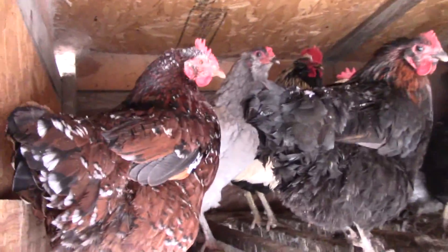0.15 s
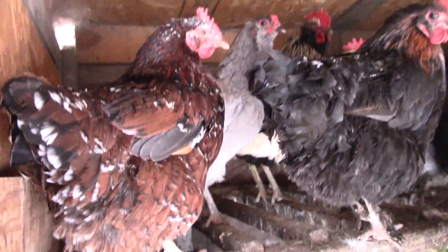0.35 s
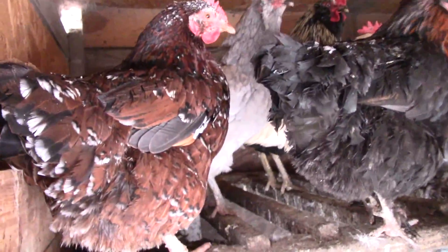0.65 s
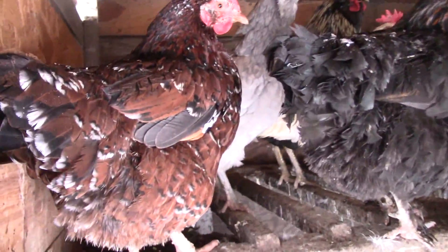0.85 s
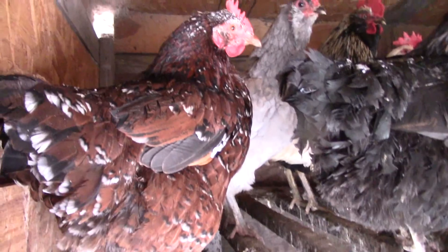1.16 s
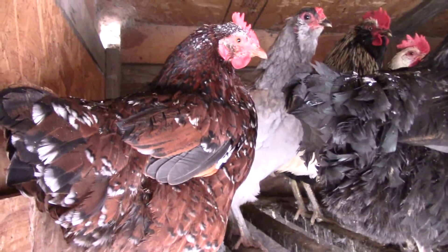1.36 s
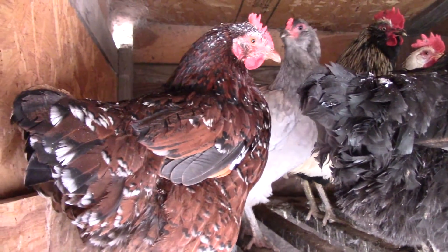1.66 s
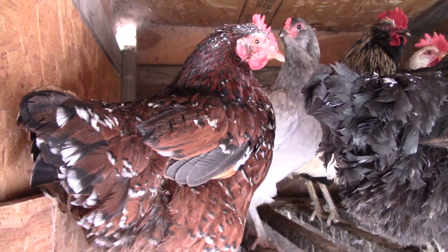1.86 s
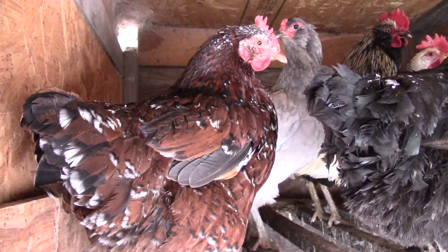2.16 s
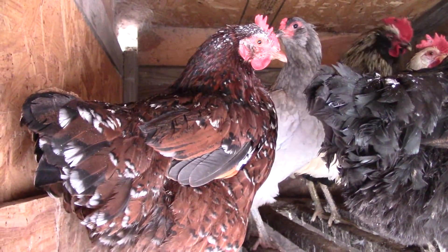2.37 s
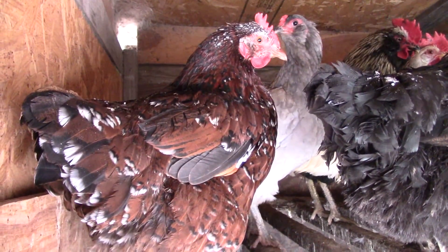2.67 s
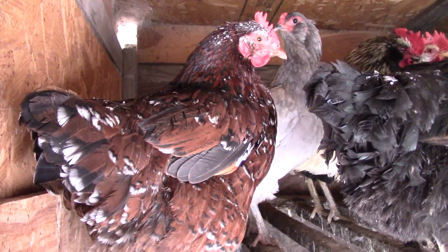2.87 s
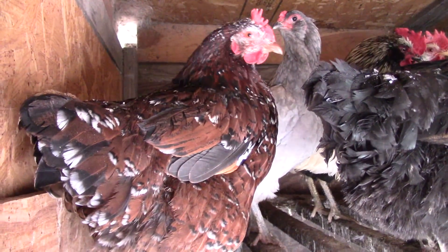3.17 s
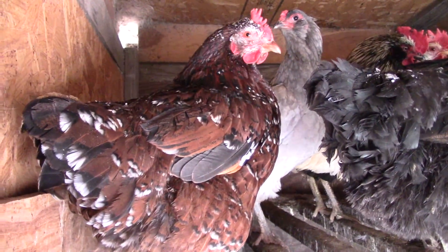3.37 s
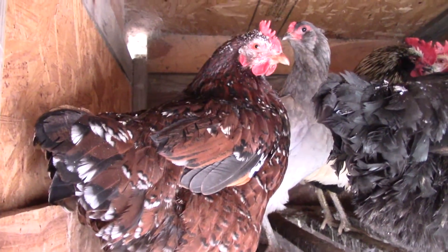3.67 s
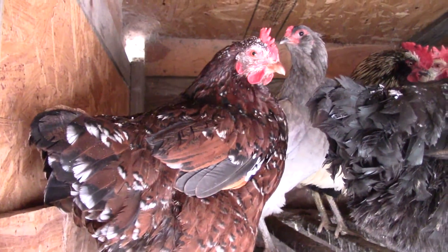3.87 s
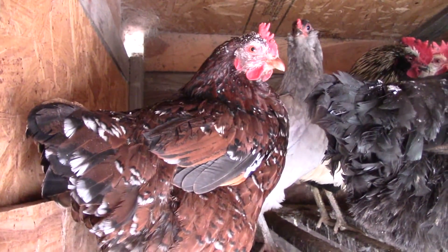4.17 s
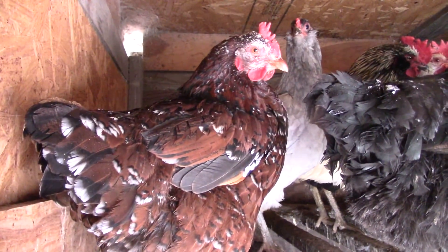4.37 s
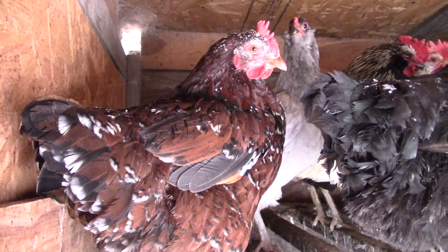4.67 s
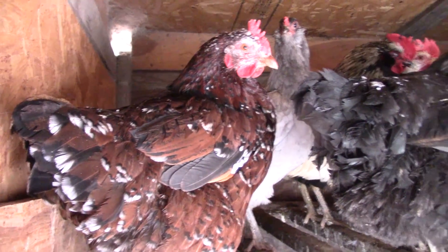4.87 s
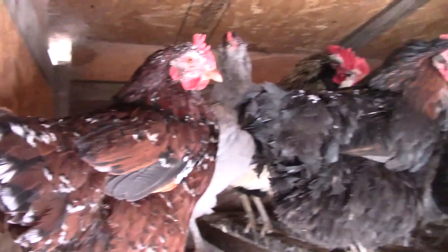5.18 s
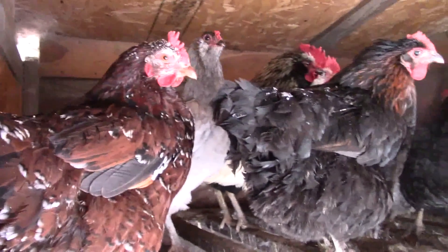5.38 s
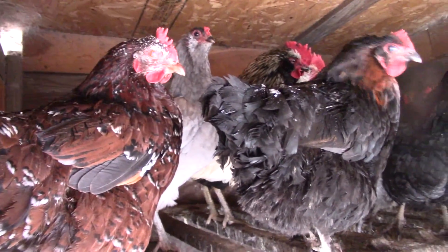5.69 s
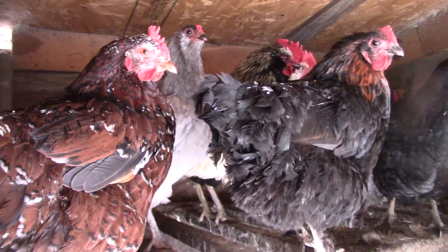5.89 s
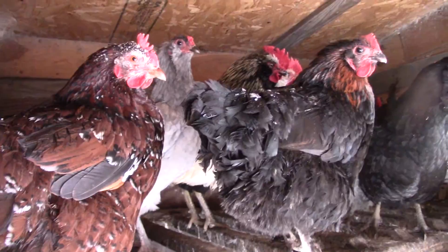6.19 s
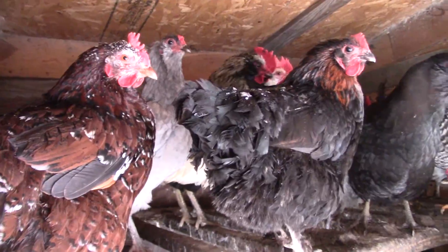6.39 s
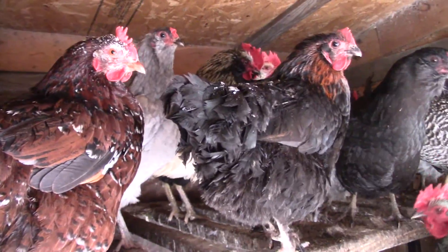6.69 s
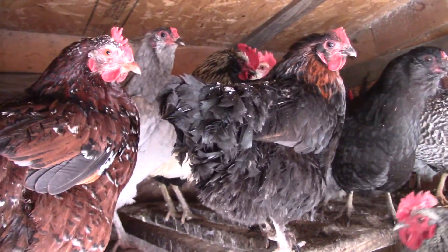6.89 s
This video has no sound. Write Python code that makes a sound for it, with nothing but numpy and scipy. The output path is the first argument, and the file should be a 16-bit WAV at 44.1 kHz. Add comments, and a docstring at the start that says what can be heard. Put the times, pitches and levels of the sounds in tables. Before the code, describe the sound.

A flock of hens shifts on wooden perches, heard by a close stereo microphone with a tight, short echo. A nasal cluck opens, one hoarse sustained call follows, then clipped clucks at uneven gaps. Low purring clucks and a few brighter pops come mid-way, then the voices die away. Dull thuds, claw taps, dry clicks and litter rustle continue quietly to the end.

```python
"""A short nasal cluck, then one long hoarse call, then short clucks traded and dying down: hens in a plywood coop.
Voices are harmonic stacks; clucks sit under bell-shaped puffs. Low thuds and claw ticks are damped sines and noise.
Dry clicks and crackles are band noise, feathers and litter dense noise grains, faint high tones wavering sines,
the hush shaped noise. Feedback delays give voices, thuds and claws the coop's short echo."""
import sys
import numpy as np
from scipy import signal
from scipy.fft import rfft, irfft, next_fast_len
from scipy.io import wavfile

SR = 44100
rng = np.random.default_rng(int(sys.argv[2]) if len(sys.argv) > 2 else 0)


def bounce(signal):
    """Save signal as a 16-bit WAV file at the path given by the first command-line argument."""
    frames = np.transpose(np.atleast_2d(signal))
    limited = np.clip(frames, -1, 1)
    pcm = np.round(limited * 32767).astype(np.int16)
    wavfile.write(sys.argv[1], SR, pcm)


N = 310331

# outdoor hush spectrum: (frequency [Hz], relative density [dB per Hz])
HUSH_SPECTRUM = [(15, -52), (30, -19), (123, -3), (256, -3), (700, -14), (2600, -24), (6600, -26),
                 (13000, -35.5), (17000, -37.5)]
HUSH_RMS_DB = -56.5
# left-right likeness of noise: (frequency [Hz], likeness [-1 to 1])
LIKENESS = [(40, 0.95), (250, .99), (1650, 0.81), (15000, 0.92)]

COOP_T60_S, WALL_CUT_HZ, COOP_DB = 0.073, 12000, -10
TOP_CUT_HZ = 16300

# faint wavering high tones: (start [s], length [s], start pitch [Hz], end pitch [Hz], mean level [dB])
HIGH_TONES = [(6.008, .03, 10300, 12500, -64), (6.238, .06, 14000, 12400, -62),
              (5.965, .18, 6950, 7050, -65)]

# short dry clicks and crackles: (time [s], peak [dB], band centre [Hz])
CRACKLES = [(0.6, -34, 1750), (5.135, -41, 1962), (5.2285, -40, 1600), (2.992, -48, 2870),
            (4.622, -47, 3480), (4.695, -37.5, 2640), (4.858, -42.5, 2200), (0.9303, -46.5, 5300),
            (3.7055, -44, 7800), (4.0572, -51, 4030), (5.2604, -45.5, 9140), (5.3373, -47, 6000),
            (5.766, -47, 5270), (5.856, -41.5, 7050), (6.2264, -41, 7750), (6.6104, -48, 9180),
            (2.5232, -47, 13700), (5.3617, -49, 12700), ]
FAINT_PER_S, FAINT_MAX_DB, CRACKLE_T60_S = 8.9, -58, 0.015
CRACKLE_HALF_BAND = 0.15   # share of the band centre

# flock shifting about: (time [s], rustle level [dB], shuffle level [dB])
STIR = [(0, -54.5, -33.5), (.12, -51, -51.5), (.18, -60.5, -47.5), (.95, -59.5, -45.5), (1.1, -49, -46.5),
        (1.2, -65.5, -56.5), (1.65, -66.5, -52), (2.05, -58.5, -51.5), (2.7, -63.5, -57), (3.28, -63, -56),
        (3.36, -52, -45.5), (3.6, -60.5, -49), (4.25, -62, -56.5), (4.45, -55.5, -48), (4.95, -61, -55),
        (5.07, -54.5, -49.5), (5.35, -63.5, -58.5), (6.9, -61.5, -53.5), (7.04, -47, -57)]
# feather and litter rustle: (frequency [Hz], relative density [dB per Hz])
RUSTLE_SPECTRUM = [(700, -5.5), (1200, -0.5), (2760, -8), (7300, -16), (14000, -30), (17000, -34)]
# shifting weight: (frequency [Hz], relative density [dB per Hz])
SHUFFLE_SPECTRUM = [(35, -61), (140, -8.5), (280, -2.5), (700, -9.5), (2500, -30), (3300, -27.5)]
SWISH_S, SWISH_HALF_S, SWISH_DB, SWISH_HZ = 5.058, 0.032, -56.5, (2200, 7200)

# low thuds and one low blunt cluck: (time [s], peak [dB], main ring [Hz])
THUDS = [(1.657, -28.5, 352), (1.934, -25, 338), (1.991, -26.5, 410), (2.074, -33.5, 387),
         (2.198, -36, 376), (2.271, -28.5, 293), (2.525, -30.5, 293), (2.572, -26.5, 319),
         (2.598, -30, 314), (3.319, -32, 222), (3.57, -21.5, 370), (4.296, -32.5, 428), (4.472, -32.5, 271),
         (5.085, -35, 212), (5.224, -26, 292), (5.501, -40, 353), (5.66, -40.5, 380), (5.976, -33.5, 420),
         (6.078, -39, 380), (6.204, -34, 312), (6.459, -35, 530), (6.856, -31, 295), (7.016, -27, 174)]

# claws and beaks on wood: (time [s], snap onset [dB], knock before KNOCK_GAIN and band-pass [dB], wood struck)
TICKS = [(0.4697, -36.5, -47, "board"), (1.0335, -32.5, -34, "slat"), (1.122, -26, -30.5, "slat"),
         (1.3139, -44, -49, "board"), (1.826, -38, -23, "slat"), (1.8445, -29, -48, "slat"),
         (1.932, -44, -28, "slat"), (1.9885, -34.5, -21, "slat"), (2.199, -46, -34, "slat"),
         (2.209, -55, -35, "slat"), (2.272, -49, -51, "slat"), (2.471, -44, -35.5, "slat"),
         (2.5616, -28.5, -17.5, "board"), (2.5721, -50, -11, "board"), (2.6063, -40, -22.5, "board"),
         (2.9399, -30.5, -26, "board"), (2.946, -47, -10, "board"), (3.315, -42, -32, "slat"),
         (3.425, -44, -35, "slat"), (3.5238, -45.5, -37, "board"), (4.186, -42, -50, "slat"),
         (4.4293, -48, -27.5, "board"), (4.4739, -62, -28.5, "board"), (4.695, -43, -32, "board"),
         (5.0833, -48, -31.5, "board"), (6.851, -44.5, -38, "board"), (7.01, -34, -42, "board")]
# wood: (tip skid [s], modes as (frequency [Hz], relative level [dB], t60 [s]))
WOODS = {"board": (.0001, [(760, -16, 0.026), (870, 3, 0.012), (975, -8, 0.01), (2230, -22.5, 0.025)]),
         "slat": (.006, [(1047, 1, 0.022), (1346, 3.5, 0.0092), (1750, -4, 0.0084), (2140, -3.5, 0.017),
         (3260, 2, 0.0071)])}
# hard-tip snap: (frequency [Hz], relative density [dB per Hz])
SNAP_SPECTRUM = [(900, -43), (1600, 2.5), (5600, 6.5), (8000, -12.5), (14000, -29), (17000, -13)]
KNOCK_GAIN = 0.64

VOICE_LEAN_HZ, VOICE_LEAN_LAG_S = (450, 850), .00028
CALL_LEAN_DB, CLUCK_LEAN_DB = -21, -22.5

# long call contour: (time [s], pitch [Hz], fundamental rms [dB], hoarseness [0-1])
CALL = [(.187, 397, -30, 0.6), (.201, 327.4, -26, 0.03), (.235, 334.3, -27, 0.25), (.29, 316.7, -28.5, 0.2),
        (.334, 322, -27.5, 0.14), (.38, 315.5, -29.5, 0.16), (.435, 324.7, -29, 0.03),
        (.48, 312.5, -29, 0.2), (.56, 310.3, -29, 0.2), (.62, 321, -29.5, 0.1), (.77, 316, -30.5, 0.27),
        (.81, 312, -32, 0.67), (.91, 320.5, -32, 0.39), (.98, 324, -31, 0.42), (1.018, 332, -67, 0.05)]
# voice catches in the call: (time [s], fundamental drop [dB], pitch drop [Hz])
CATCHES = [(0.26, 6.5, 18.95), (0.809, 0.5, 6.3), (.94, 8, 5.2)]
# overtone colour of the call: (frequency [Hz], level [dB])
CALL_THROAT = [(900, -0.5), (1500, 0), (2000, -12), (2600, -7), (3250, -7.5), (3600, -23.5), (4450, -19),
               (5000, -28.5), (5900, -22.5), (6500, -27.5)]
CATCH_HALF_S = 0.01374
SECOND_FOLLOWS = 0.63   # share of the fundamental's drop made by the second harmonic
SECOND_DB = 2.5         # over the fundamental
BURST_DB, BURST_HALF_S = 2.5, 0.013   # extra second harmonic as the call opens
FLUTTER_HZ, FLUTTER_DEPTH = 53, 0.51  # depth at full hoarseness
RASP_HZ, RASP_DB = (440, 590), -1.5   # noise under the second harmonic, at full hoarseness
OVERTONES_DB = -24               # re second harmonic, at the start
SIXTH_FADE_DB_PER_S = 8.5        # fade of harmonic 6; in proportion to order for the others

# clucks: (peak time [s], rise plus fall [ms], pitch at peak [Hz], glide [relative rate, + rises],
#          peak [dB], overtones re peak [dB], voice)
CLUCKS = [(0.036, 40.5, 329.8, -0.5, -18, -27, "nasal"), (.112, 59, 256, 0, -47, 7, "even"),
          (.324, 135, 192.6, -1, -41, -31, "hollow"), (0.729, 87, 1089, 1.3, -49, -24, "hollow"),
          (1.078, 16.7, 418, 0.5, -17.5, -46, "hollow"), (1.198, 19.4, 424, 2.5, -18, -32, "hollow"),
          (1.214, 13, 317, -5.5, -29, -38, "even"), (1.318, 17.2, 414.7, 11, -16.5, -20.5, "hollow"),
          (1.331, 20.5, 313, -4.5, -19, -24, "nasal"), (1.459, 21.5, 319, -4, -17.5, -20, "nasal"),
          (1.6, 13.6, 310.6, -6.5, -25.5, -33, "nasal"), (1.725, 21.6, 323, -3, -19, -17.5, "nasal"),
          (1.755, 12, 300, -6, -34.5, -22, "even"), (1.869, 20.5, 311, -0.5, -22.5, -20.5, "nasal"),
          (2.031, 24, 312, -1.5, -23, -18, "nasal"), (2.476, 22.5, 284, 2.4, -39.5, -19, "even"),
          (2.815, 32, 252, 0.7, -42, -3, "even"), (2.849, 41, 270, -3.5, -47.5, -5, "even"),
          (2.909, 47.5, 266.6, 0.55, -32.5, -5.5, "even"), (3.096, 36, 262.6, -0.5, -33.5, -3.5, "even"),
          (3.347, 12.7, 406, -3, -31, -3.5, "nasal"), (3.358, 11.7, 457, -9.5, -18.5, -24, "hollow"),
          (3.422, 52, 264.2, -0.3, -32.5, -13.5, "even"), (3.616, 49, 257.5, 0.5, -33.5, -8, "even"),
          (3.729, 45, 398, -2, -39, -34, "hollow"), (3.74, 11.1, 461, -1, -16, -26, "hollow"),
          (3.79, 36.5, 262, -0.2, -38, -15.5, "even"), (3.867, 21, 314, 8, -32, -26, "nasal"),
          (3.879, 11.3, 370, -5.5, -22.5, -18.5, "nasal"), (3.883, 12.6, 397, 3.5, -15, -40, "hollow"),
          (3.92, 38.6, 266.3, -2.5, -34.5, -2.5, "even"), (4.035, 11.8, 342, 19, -29.5, -37, "even"),
          (4.052, 15.6, 513, 5, -10, -66.5, "hollow"), (4.134, 8.3, 350, -1, -38.5, -31, "gruff"),
          (4.156, 14.8, 519, -19.5, -22, -34, "hollow"), (4.171, 14, 426, 10, -25, -31, "hollow"),
          (4.188, 14.3, 309, 6.5, -26.5, -11, "gruff"), (4.33, 17, 360, -11.5, -19, -17.5, "gruff"),
          (4.43, 120, 1127, 0.5, -53.5, -25, "hollow"), (4.803, 46, 268.7, -1.9, -43.5, -14, "hollow")]
# voice: (rising share [0-1], breath re peak [dB], harmonics 1-3 re peak [dB], their share of the overtones' dB,
#         puff exponent, lag of upper harmonics [share of length])
VOICES = {"hollow": (.4, -35, [0, 1, -28], [0, 0.76, 0.7], 3.5, 0.05), "nasal": (.41, -17.5, [-7, 0, -10],
          [0, 0, 0.35], 1.9, 0.16), "even": (.36, -29, [0, -0.14, -4.5], [0, 0, 0.52], 2.05, -0.063),
          "gruff": (0.44, -16, [0, -3.5, -20], [0, 0.1, 0.31], 1.57, 0.14)}
# voice: pitch jitter [share of pitch]
JITTER = {"hollow": .015, "nasal": .016, "even": .011, "gruff": .08}
# voice: strong-weak cycle depth at full breath [0-1]
SPLIT = {"hollow": 0, "nasal": .36, "even": .06, "gruff": .5}
# overtone colour of a cluck: (frequency [Hz], level [dB])
CLUCK_THROAT = [(1050, 2.5), (1310, -3.5), (1600, -8.5), (1830, -14), (2100, -23.5), (2380, -17),
                (2900, -26), (3430, -22.5), (3900, -32.5), (5000, -46)]
ABRUPT_GLIDE = 34.37   # a downward glide this fast halves the rise time
PITCH_SAG = 0.0412     # share of pitch lost where the puff is weak


def from_db(db):
    """Decibels to gain."""
    return 10 ** (np.asarray(db) / 20)


def rms_one(x):
    """Scale to rms 1."""
    return x / np.sqrt(np.mean(x ** 2) + 1e-20)


def band_pass(x, low_hz, high_hz):
    """Second-order Butterworth band-pass."""
    return signal.sosfilt(signal.butter(2, [low_hz, high_hz], "band", fs=SR, output="sos"), x)


def over_span(rows):
    """Sample slice of a time table and its other columns read at every sample."""
    s, *columns = np.transpose(rows)
    span = slice(round(s[0] * SR), min(round(s[-1] * SR), N))
    t = np.arange(N)[span] / SR
    return span, [np.interp(t, s, column) for column in columns]


def at_hz(points, hz):
    """Spectrum read on a log-frequency axis."""
    points_hz, points_db = np.array(points).T
    return np.interp(np.log(hz), np.log(points_hz), points_db)


def drift(rate_hz, size=N):
    """Slow chance of spread 1: noise through a double one-pole low-pass, every 20 samples."""
    r = np.exp(-40 * np.pi * rate_hz / SR)
    noise = rng.standard_normal(size // 20 + 2002)
    slow = signal.lfilter([1], [1, -2 * r, r * r], noise)[2000:]   # settled part
    return np.interp(np.arange(size) / 20, np.arange(len(slow)), rms_one(slow))


def ring(clicks, hz, t60_s):
    """Two-pole resonator: a unit click starts a decaying sine of height 1."""
    r, w = from_db(-60 / (t60_s * SR)), 2 * np.pi * hz / SR
    return signal.lfilter([0, np.sin(w)], [1, -2 * r * np.cos(w), r * r], clicks + 1e-18)


def coloured(sources, spectrum, patchy_db):
    """Half-octave bands dealt in turn from two mid-side sources, each with own level, flicker and likeness."""
    out, edges_hz = 0, 25 * 2 ** np.arange(0, 9.6, .5)
    for k, (low_hz, high_hz) in enumerate(zip(edges_hz, edges_hz[1:])):
        hz = np.sqrt(low_hz * high_hz)
        if spectrum[0][0] < hz < spectrum[-1][0]:
            mid, side = band_pass(sources[k % 2], low_hz, high_hz)
            alike = np.clip(at_hz(LIKENESS, hz), -1, 1)
            gain = from_db(at_hz(spectrum, hz) + patchy_db * drift(7.0))
            stereo = np.sqrt(1 + alike) * mid + np.sqrt(1 - alike) * side * [[1], [-1]]
            out = out + gain * stereo
    return rms_one(out)


def grains(per_s, spread_db, decay_s):
    """Uneven little contacts at random moments, each a puff of noise that dies away."""
    born = rng.random((2, 1, N)) < per_s * from_db(2.2 * drift(15)) / SR
    sizes = born * from_db(spread_db * np.minimum(rng.exponential(1, (2, 1, N)), 4))
    puffs = signal.lfilter([1], [1, -np.exp(-1 / (decay_s * SR))], sizes + 1e-18)
    return puffs * rng.standard_normal((2, 2, N))


def hush():
    """Steady shaped noise, mostly low, with slowly flickering bands."""
    noise = rng.standard_normal((2, 2, N))
    return from_db(HUSH_RMS_DB) * coloured(noise, HUSH_SPECTRUM, patchy_db=2.5)


def coop(x):
    """Six short feedback delays a side, duller on every round, evaluated as one frequency response."""
    size = next_fast_len(N + SR)
    w = 2 * np.pi * np.fft.rfftfreq(size)   # radians per sample
    wall = 1 / (1 + 1j * w * SR / (2 * np.pi * WALL_CUT_HZ))
    response = np.zeros((2, len(w)), complex)
    lags_s = [.0071, .0083, .0097, .0109, .0127, .0139, .0151, .0173, .0191, .0211, .0233, .0257]
    for k, lag_s in enumerate(lags_s):
        loop = from_db(-60 * lag_s / COOP_T60_S) * wall * np.exp(-1j * w * lag_s * SR)
        response[k % 2] += (-1) ** (k // 2) * loop / (1 - loop)
    shared = response.mean(axis=0)   # the close-set microphones hear much the same walls
    stereo = shared + 0.059 * (response - shared)
    return irfft(rfft(x, size) * stereo, size)[:, :N]


def high_tones():
    """Faint high tones: gliding sines with wavering pitch and level."""
    out = np.zeros(N)
    for s, length_s, from_hz, to_hz, level_db in HIGH_TONES:
        span, (hz, db) = over_span([(s, from_hz, level_db), (s + length_s, to_hz, level_db)])
        size = len(hz)
        phase = 2 * np.pi * np.cumsum(hz * (1 + 0.014 * drift(300, size))) / SR
        gain = from_db(db + 3.4 * drift(37, size))
        out[span] += gain * np.sin(phase) * signal.windows.tukey(size, .2)
    return out


def crackles():
    """Short dry clicks: tiny bursts of noise, each around its own pitch; faint ones come at random."""
    chance = rng.random((round(FAINT_PER_S * N / SR), 3))
    faint_s, faint_db = chance[:, 0] * N / SR, FAINT_MAX_DB - 10 * chance[:, 1]
    faint_hz = 3000 * 5 ** chance[:, 2]
    out, t = np.zeros(N + SR), np.arange(SR // 50) / SR
    for s, db, hz in np.r_[CRACKLES, np.c_[faint_s, faint_db, faint_hz]]:
        noise = rng.standard_normal(len(t)) * from_db(-60 * t / CRACKLE_T60_S)
        burst = band_pass(noise, hz * (1 - CRACKLE_HALF_BAND), hz * (1 + CRACKLE_HALF_BAND))
        out[round(s * SR):][:len(t)] += from_db(db) * burst / np.abs(burst).max()
    return out[:N]


def wing_swish():
    """A wing brushes the air: one flat-topped puff of band noise."""
    air = rms_one(band_pass(rng.standard_normal(N), *SWISH_HZ))
    return from_db(SWISH_DB) * air * np.exp(-((np.arange(N) / SR - SWISH_S) / SWISH_HALF_S) ** 4)


def stirring():
    """Feathers and litter rustle in the treble; shifting weight creaks and bumps below."""
    _, (rustle_db, shuffle_db) = over_span(STIR)
    rustle = coloured(grains(400, spread_db=4.0, decay_s=.002), RUSTLE_SPECTRUM, patchy_db=2.2)
    shuffle = coloured(grains(350, spread_db=2.0, decay_s=0.0044), SHUFFLE_SPECTRUM, patchy_db=3.5)
    return from_db(rustle_db) * rustle + from_db(shuffle_db) * shuffle


def thuds():
    """Low blunt sounds: a softly starting damped sine with a short dull noise rattle."""
    out, t = np.zeros(N + SR), np.arange(SR // 8) / SR
    for s, db, hz in THUDS:
        rattle = rms_one(band_pass(rng.standard_normal(len(t)), 140, 900))
        tone = np.sin(2 * np.pi * hz * t) * np.exp(-t / 0.0074)
        blow = tone + 0.29 * rattle * np.exp(-t / 0.012)
        blow = blow * (1 - np.exp(-t / 0.001))   # soft onset
        out[round(s * SR):][:len(t)] += from_db(db) * blow / np.abs(blow).max()
    return out[:N]


def tip_snaps():
    """A hard tip gives a bright noise snap: fast decay, weaker slow tail, random left-right lean."""
    t, bursts = np.arange(SR // 20) / SR, np.zeros((2, N + SR))
    shape = np.exp(-t / .0008) + .3 * np.exp(-t / .008)
    for s, snap_db, *_ in TICKS:
        i, lean_db = round(s * SR), rng.normal(0, 3.3)
        side_db = snap_db + lean_db * np.array([[.5], [-.5]])
        bursts[:, i:i + len(t)] += from_db(side_db) * shape / shape[0]
    return bursts[:, :N] * coloured(rng.standard_normal((2, 2, N)), SNAP_SPECTRUM, patchy_db=5.0)


def wood_knocks():
    """Tips set the modes of the wood ringing, cleanly or by six touches spread over a skid."""
    at = np.array([round(row[0] * SR) for row in TICKS])
    knock_db = np.array([row[2] for row in TICKS])
    knock = np.zeros(N + SR)
    for wood, (skid_s, modes) in WOODS.items():
        hit = np.array([row[3] == wood for row in TICKS])
        late = (rng.random((hit.sum(), 6)) * skid_s * SR).astype(int)
        signs = np.where(rng.random(late.shape) < skid_s / .01, -1, 1)
        touches = signs / 6 ** (1 - min(skid_s / .01, .5))   # long skids add up as power
        for k, (hz, level_db, t60_s) in enumerate(modes):
            clicks = np.zeros(N + SR)
            hit_db = knock_db[hit] + level_db + rng.normal(0, 1.2, hit.sum())
            np.add.at(clicks, at[hit, None] + late, touches * from_db(hit_db)[:, None])
            knock += (-1) ** k * ring(clicks, hz, t60_s)
    # a short contact on thin wood: rounded, without bass
    return KNOCK_GAIN * band_pass(knock[:N], 600, 2600)


def leaning(x, db):
    """The second-harmonic band differs a little between sides: stronger left, slightly out of step."""
    side = signal.sosfiltfilt(signal.butter(2, VOICE_LEAN_HZ, "band", fs=SR, output="sos"), x)
    late = np.interp(np.arange(N) - VOICE_LEAN_LAG_S * SR, np.arange(N), from_db(db) * side)
    return x + late * [[1], [-1]]


def long_call():
    """Two strong harmonics from a closed beak and faint overtones; hoarseness wavers, splits and rasps them."""
    out = np.zeros(N)
    span, (hz, level_db, hoarse) = over_span(CALL)
    size, hoarse = len(hz), np.clip(hoarse, 0, 1)
    t = np.arange(N)[span] / SR

    s, drop_db, drop_hz = np.transpose(CATCHES)
    catch = np.exp(-((t[:, None] - s) / CATCH_HALF_S) ** 2)
    hz = hz - catch @ drop_hz
    first_db = level_db - catch @ drop_db
    burst_db = BURST_DB * np.exp(-((t - CALL[1][0]) / BURST_HALF_S) ** 2)
    second_db = level_db + SECOND_DB - SECOND_FOLLOWS * catch @ drop_db + burst_db

    jitter = (0.0026 + 0.044 * hoarse ** 2) * drift(53, size)
    phase = 2 * np.pi * np.cumsum(hz * (1 + jitter)) / SR
    # strong-weak cycles: half-pitch lines
    uneven = 1 + 0.4 * hoarse ** 2 * drift(32, size) * np.cos(phase / 2 + drift(37, size))
    flutter = 1 + FLUTTER_DEPTH * hoarse * np.cos(2 * np.pi * FLUTTER_HZ * t)
    rasp = from_db(RASP_DB) * hoarse ** 2 * rms_one(band_pass(rng.standard_normal(size), *RASP_HZ))
    first = from_db(first_db) * np.cos(phase)
    second = from_db(second_db) * flutter * (uneven * np.cos(2 * phase + 1.2) + rasp)
    voice = first + second

    fade_db = SIXTH_FADE_DB_PER_S * (t - t[0])
    for order in range(3, 21):
        waver_db = 2 * drift(27, size) + 1.0 * drift(3.9, size)
        order_db = second_db + OVERTONES_DB - fade_db * order / 6 + at_hz(CALL_THROAT, order * hz)
        order_db = order_db + waver_db - 9 * hoarse
        voice += from_db(order_db) * np.sin(order * phase + rng.uniform(0, 2 * np.pi))
    out[span] = np.sqrt(2) * voice * signal.windows.tukey(size, .01)   # rms levels to sine peaks
    return out


def clucks():
    """Each cluck is a gliding harmonic stack under a bell-shaped puff of air; fast glides have ragged overtones."""
    out, orders = np.zeros(N), np.arange(1, 19)[:, None]
    for s, length_ms, hz, glide, peak_db, overtones_db, voice in CLUCKS:
        rising, breath_db, harmonics_db, follows, square, lag = VOICES[voice]
        rising = rising / (1 + max(-glide, 0) / ABRUPT_GLIDE)
        rise_ms, fall_ms = rising * length_ms, (1 - rising) * length_ms
        # from three rise times before the peak to four fall times after
        at = np.arange(max(round((s - rise_ms * .003) * SR), 0), round((s + fall_ms * .004) * SR))
        t = at / SR - s
        size = len(t)

        def bell(ms):
            """Puff strength around its peak."""
            return np.exp(-np.abs(ms / np.where(ms < 0, rise_ms, fall_ms)) ** square)

        puff, upper_puff = bell(1000 * t), bell(1000 * t - lag * length_ms)

        # steep through the peak, levelling off at both ends
        bend = np.where(t < 0, 0.461 * np.tanh(glide * t / 0.2485), 0.29 * np.tanh(glide * t / 0.18))
        pitch = hz * (1 + bend - PITCH_SAG * (1 - puff) + JITTER[voice] * drift(61.3, size))
        phase = 2 * np.pi * np.cumsum(pitch) / SR

        stack_db = peak_db + overtones_db + at_hz(CLUCK_THROAT, orders * hz) + rng.normal(0, 1.5, orders.shape)
        stack_db[:3, 0] = peak_db + np.array(harmonics_db) + overtones_db * np.array(follows)
        stack = from_db(stack_db) * np.cos(orders * phase + .4 * orders ** 2)

        ragged = np.clip(abs(glide) / 9, .05, .7)
        # overtones take the delayed puff twice: they need the most air
        overtones = stack[3:].sum(axis=0) * upper_puff ** 0.98 * (1 - ragged + ragged * drift(300, size))
        breath = band_pass(rng.standard_normal(size), 250, 1600) * from_db(peak_db + breath_db + 2 * ragged)
        shimmer = np.array([from_db(1.2 * ragged * drift(70, size)) for _ in range(3)])
        first, second, third = shimmer * stack[:3]
        # strong-weak cycles
        half_pitch = np.cos(phase / 2 + rng.uniform(0, 2 * np.pi))
        split = 1 + SPLIT[voice] * puff * (1 + .5 * drift(40, size)) * half_pitch
        out[at] += puff * (first + split * second + breath * (1 + np.cos(phase)))
        out[at] += upper_puff * split * (third + overtones)
    return out


def scene():
    """Birds and wood in the coop, over the hush."""
    background = hush() + high_tones() + crackles() + wing_swish() + stirring()
    near = thuds() + tip_snaps() + wood_knocks()
    near = near + leaning(long_call(), CALL_LEAN_DB) + leaning(clucks(), CLUCK_LEAN_DB)
    # small bodies radiate no deep bass
    near = signal.sosfilt(signal.butter(2, 110, "high", fs=SR, output="sos"), near)
    return background + near + from_db(COOP_DB) * coop(near.mean(axis=0))


def record(dry):
    """The microphone drops the deep bass and the top is cut steeply."""
    bass_cut = signal.sosfilt(signal.butter(1, 35, "high", fs=SR, output="sos"), dry)
    return signal.sosfilt(signal.cheby2(14, 50, TOP_CUT_HZ, fs=SR, output="sos"), bass_cut)


dry = scene()
out = record(dry)
bounce(out)
```